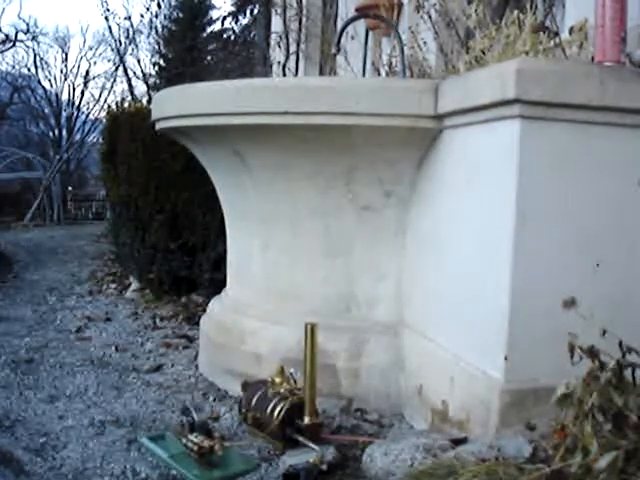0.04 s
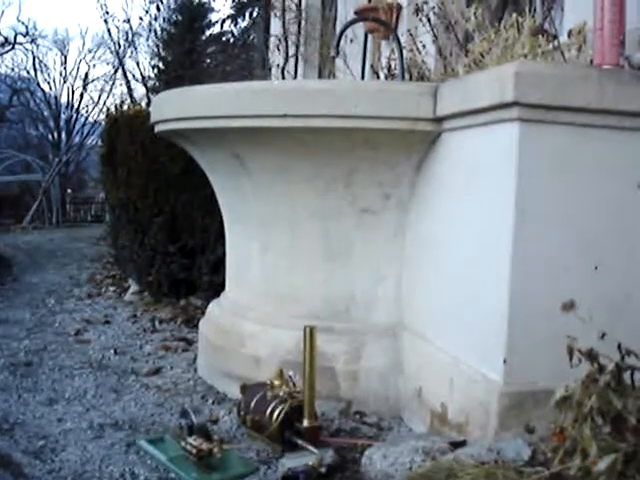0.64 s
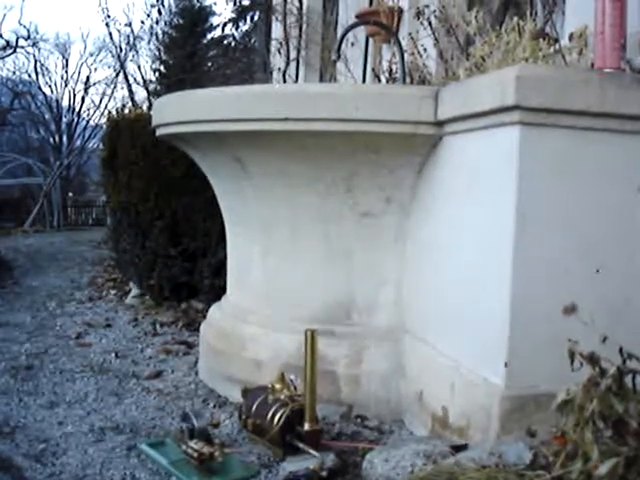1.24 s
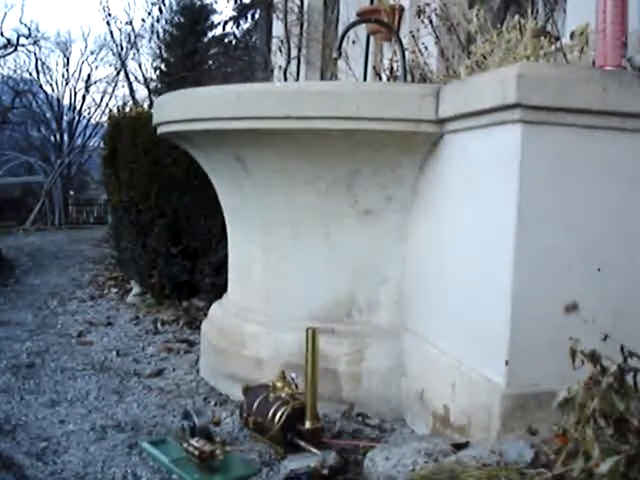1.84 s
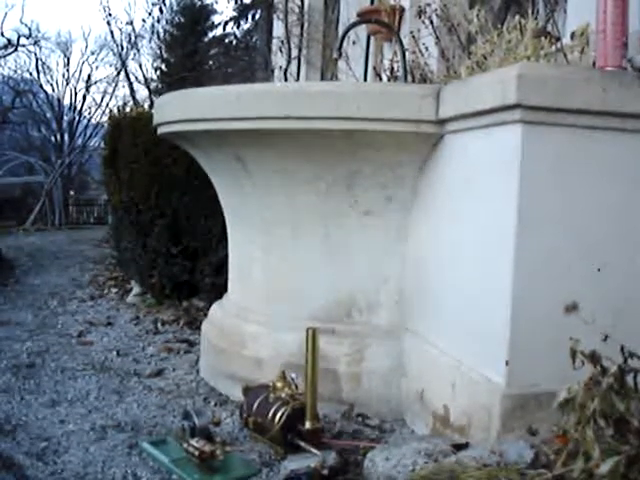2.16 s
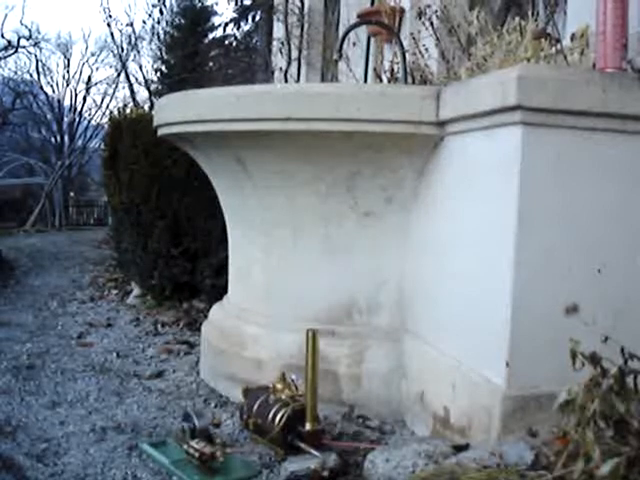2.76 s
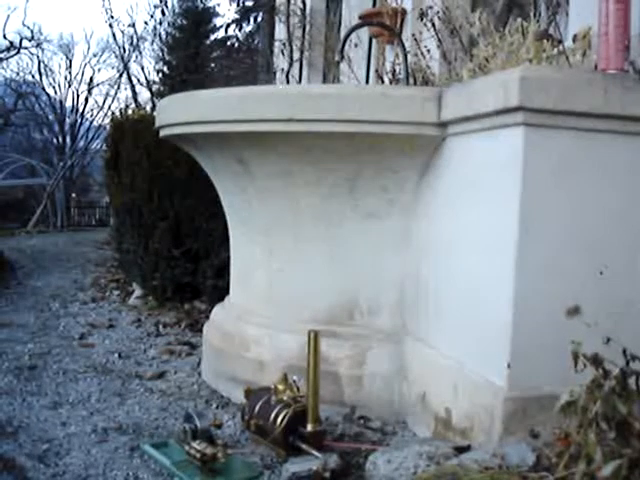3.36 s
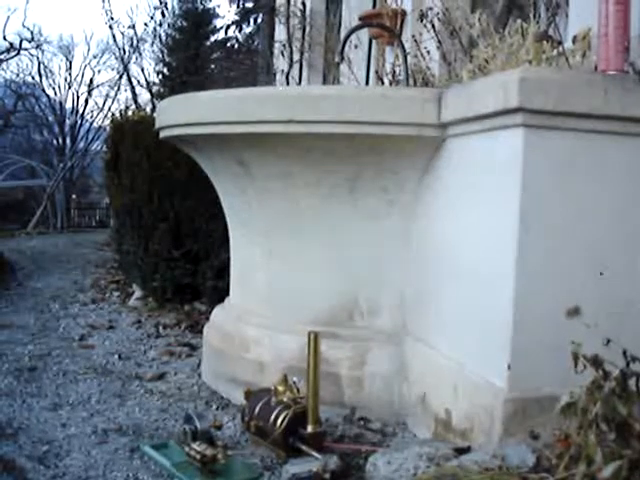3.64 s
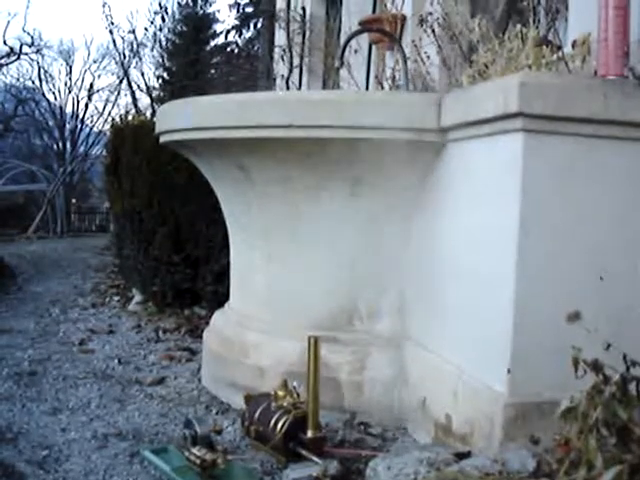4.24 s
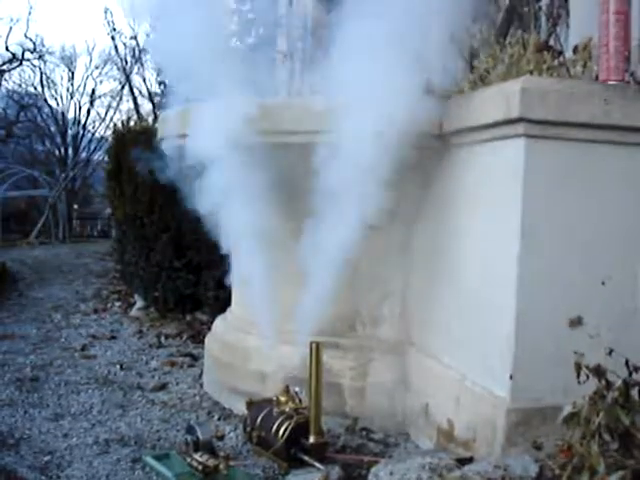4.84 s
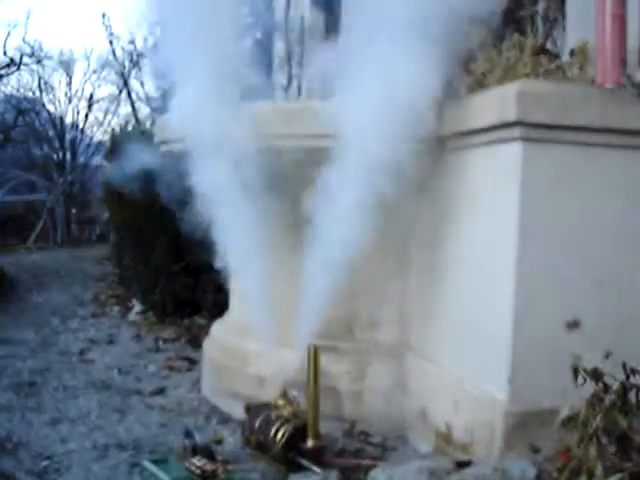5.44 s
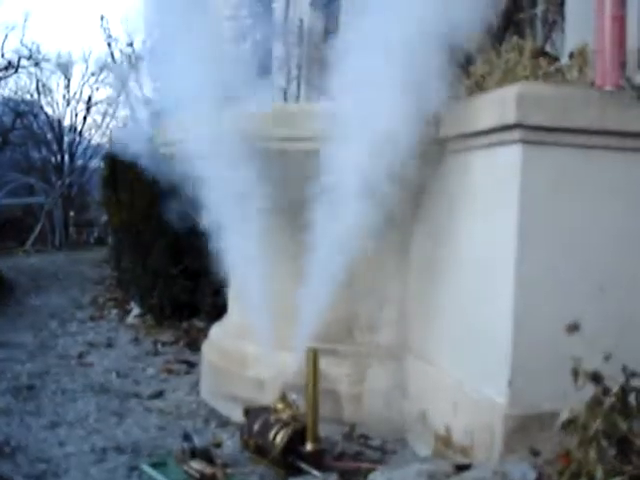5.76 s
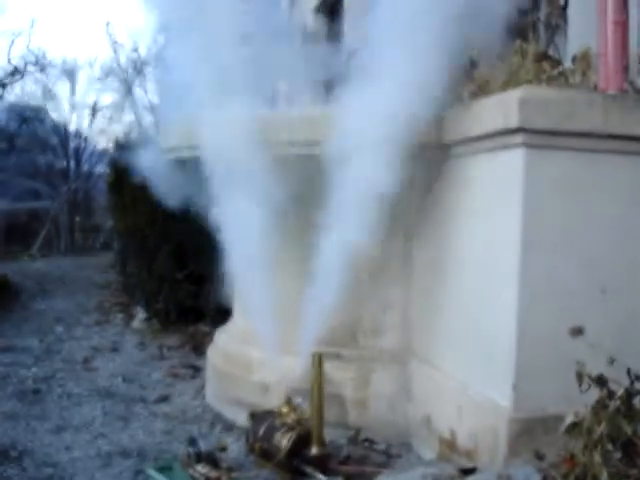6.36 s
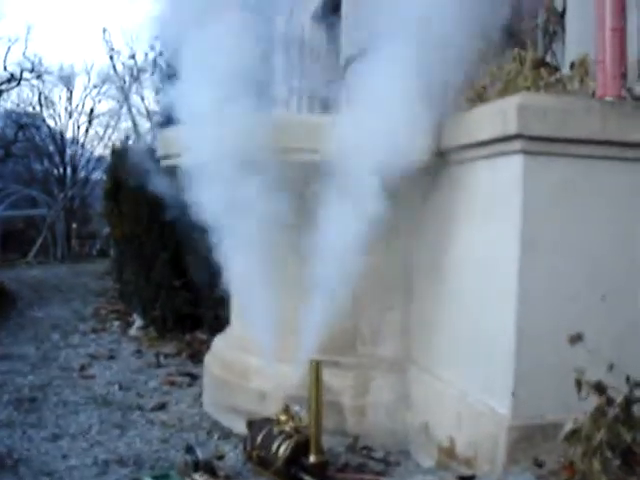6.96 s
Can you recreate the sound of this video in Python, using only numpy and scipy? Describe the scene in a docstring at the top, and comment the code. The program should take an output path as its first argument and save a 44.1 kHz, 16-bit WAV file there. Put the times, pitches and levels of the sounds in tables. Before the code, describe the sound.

Steady, hollow burner roar with a faint thin hiss, switching suddenly to the high, even hiss of jetting steam.

```python
"""Boiler blowing off steam

A small boiler roars outdoors against a stone wall, its flame ringing the flue, its safety valve simmering.
The valve pops open and steam jets out. The jet's shrill core, at the very top of the treble, slams the
limiter and is then filtered off: the roar sinks away and a bright hiss is left."""
import sys
import numpy as np
from scipy import signal
from scipy.fft import rfft, irfft, next_fast_len
from scipy.io import wavfile
from scipy.ndimage import uniform_filter1d

SR = 44100
rng = np.random.default_rng(int(sys.argv[2]) if len(sys.argv) > 2 else 0)


def pcm_store(signal):
    """Save signal as 16-bit PCM."""
    levels = np.round(np.clip(np.atleast_2d(signal), -1, 1) * 32767)
    wavfile.write(sys.argv[1], SR, levels.astype(np.int16).T)


N = 309141

# resonances of the fire tube and chimney: pitch_hz, half_width_hz, level_db
FLUE_MODES = [(147, 28.5, -14.5), (216, 3.5, -23), (340.3, 39.7, -3.5), (386, 38, -2.5), (489.6, 25, -7),
              (632, 15.8, -0.5), (697, 47, -6.2), (744, 62, -5.5), (873, 26, -11), (990, 21.5, -5),
              (1086, 101, -3), (1272, 47, -8.5), (1443, 44, -8.5), (1583, 79, -2.5), (1797, 50, -1.7),
              (1867, 56, -4), (2032, 67, -14.5)]
# resonances of the gas hissing through the burner: pitch_hz, half_width_hz, level_db
GAS_MODES = [(2710, 176, -8), (2957, 156, -7), (3050, 53, -3.5), (3235, 96, -0.8), (3584, 137, -5.5),
             (3790, 111, -12.5), (4223, 255, -8.5), (4801, 209, -20), (5220, 170, -12.5),
             (5860, 256, -11.5), (5980, 900, -18.5), (7250, 210, -16.5)]
# sputters of the flame: peak_s, half_width_s, rise_db
FLAME_SPUTTERS = [(.126, 0.011, 4), (1.993, 0.0062, 5), (2.119, .005, 5.5), (2.401, 0.0036, 5)]
# colour of the faint background rumble: frequency_hz, level_db
RUMBLE_COLOUR = [(10, 0.5), (30, 1), (50, -8), (100, -9), (300, -13.5), (3000, -31)]
# colour of the leak at the valve seat: frequency_hz, level_db
LEAK_COLOUR = [(2500, -22), (3700, 0.5), (4400, -4.5), (5300, -5.5), (6000, -7), (6700, -9), (7250, -3),
               (7600, -1), (8100, 1), (8500, 0.5), (8900, 0.5), (9350, -4.5), (10000, -10), (11500, -21.5)]
# moments when the flue sings out: start_s, end_s, pitch_hz, level_db
FLUE_NOTES = [(1.08, 1.24, 770, -30), (1.41, 1.56, 628, -27.5), (2.28, 2.71, 768, -28.5),
              (3.238, 4.1, 627, -30.5)]
# colour of the jet's shrill core: frequency_hz, level_db
CORE_COLOUR = [(10500, -56.5), (12000, -16), (16000, -11.5), (20000, -11)]
# colour of the plume's rush: frequency_hz, level_db
RUSH_COLOUR = [(150, -33), (600, -17), (2000, -11), (3000, -10.5), (3500, -3), (3800, -4.5), (4300, -3),
               (5000, 0.5), (5600, -0.5), (6100, -1), (6700, -6.5), (7100, -2), (8500, -14.5), (9900, -8.5)]
# colour of the sizzle at the valve lip: frequency_hz, level_db
SIZZLE_COLOUR = [(5500, -29.5), (6700, -18), (7400, -3), (8100, 2.5), (8500, 0.5), (8900, 0.5), (9300, 0),
                 (10000, -4.5), (11000, -12)]
# surges of the jet's core: peak_s, half_width_s, rise_db
CORE_SURGES = [(5.09, .07, 2), (5.3, .04, 2.8), (5.44, .04, 2.8), (6.49, .04, 1.5), (6.72, .04, 1.3),
               (6.9, 0.035, 1.5)]
# broad resonances of the valve outlet: pitch_hz, half_width_hz, level_db
OUTLET_MODES = [(4870, 720, 0), (6650, 750, -1.5), (9750, 380, -3.5)]

WALL_ECHO_S = 0.002358
SIMMER_DB, SIMMER_RISE_DB_PER_S = -32.5, 1.53  # the leak just before the pop, and its climb to there
CRACK_S, CRACK_RISE_S, CRACK_DB = 0.32, 0.35, 4.5  # the seat cracks open and the leak steps up
POP_S, POP_RISE_S = 4.3155, 0.012  # the valve lifts
CORE_DB, CORE_BUILD_DB, CORE_BUILD_S = 11.8, 2.2, 0.2  # full flow, how far below it starts, time constant
SAG_DB_PER_S = 1.0  # rush and sizzle fade as the boiler loses pressure
DROP_S, DROP_LENGTH_S, DROP_SIZZLE_DB, DROP_CORE_DB = 6.23, 0.11, -4.5, 0.6  # the jet's tone drops
OUTLET_DB, OUTLET_RISE_S = -11, 0.3  # the outlet's resonances swell in at the drop


def amp(db):
    """Decibels as a gain."""
    return 10 ** (np.asarray(db) / 20)


def unit_power(x):
    """The signal scaled to a power of one."""
    return x / np.sqrt(np.mean(x ** 2) + 1e-20)


def bins():
    """The frequency grid for shaping noise, in Hz."""
    return np.fft.rfftfreq(next_fast_len(N), 1 / SR)


def noise(gain):
    """Noise of unit power, shaped by a gain at each frequency."""
    size = next_fast_len(N)
    return unit_power(irfft(rfft(rng.standard_normal(size)) * gain, size)[:N])


def colour(points):
    """A gain curve drawn through a few points of a spectrum."""
    hz, db = np.transpose(points)
    return amp(np.interp(np.log(bins() + 1), np.log(hz), db))


def ringing(modes):
    """The gain curve of a set of resonances with steep skirts."""
    hz = bins()
    powers = (amp(db) ** 2 / (1 + ((hz - pitch) / width) ** 2) ** 2 for pitch, width, db in modes)
    return np.sqrt(sum(powers))


def flutter(depth_db, rate_hz):
    """Random swelling of a turbulent flow, from about once a second up to the rate."""
    hz = bins()
    return amp(depth_db * noise(hz / (hz + 1) / (1 + (hz / rate_hz) ** 2)))


def ramp(start_s, length_s):
    """Rises in a straight line from 0 to 1, then holds."""
    return np.clip((np.arange(N) / SR - start_s) / length_s, 0, 1)


def swells_db(rows):
    """A level curve of brief, bell-shaped swells."""
    t = np.arange(N) / SR
    return sum(db * np.exp(-((t - peak_s) / width_s) ** 2) for peak_s, width_s, db in rows)


def burner(roar_db, gas_db, low_cut_hz):
    """The turbulence of a steady flame rings the flue, over a smoother hiss of gas."""
    radiated = 1 / np.sqrt(1 + (low_cut_hz / (bins() + 1)) ** 4)  # a small chimney gives off no deep bass
    flame = amp(roar_db + swells_db(FLAME_SPUTTERS))
    flame *= flutter(depth_db=0.71, rate_hz=90) * flutter(depth_db=0.46, rate_hz=12)
    roar = flame * noise(ringing(FLUE_MODES) * radiated)
    gas = amp(gas_db) * noise(ringing(GAS_MODES)) * flutter(depth_db=0.5, rate_hz=30)
    return roar + gas


def wall_echo(x, share):
    """The wall just behind the valve adds one quick echo, which ripples the treble."""
    return unit_power(x + share * np.roll(x, round(WALL_ECHO_S * SR)))


def valve_simmer(split_hz):
    """A thin hiss from the seated valve grows with the pressure; its lows and highs flutter apart."""
    level_db = SIMMER_DB + SIMMER_RISE_DB_PER_S * (np.arange(N) / SR - POP_S)
    level_db -= CRACK_DB * (1 - ramp(CRACK_S, CRACK_RISE_S))
    leak = wall_echo(noise(colour(LEAK_COLOUR)), share=0.36)
    low = signal.sosfiltfilt(signal.butter(6, split_hz, fs=SR, output="sos"), leak)
    hiss = low * flutter(depth_db=1.3, rate_hz=30) + (leak - low) * flutter(depth_db=1.1, rate_hz=60)
    return amp(level_db) * hiss


def flue_note(start_s, end_s, pitch_hz, level_db, half_width_hz=17.4, fade_s=0.047):
    """One resonance of the flue swells, holds and settles again."""
    swell = ramp(start_s, fade_s) - ramp(end_s - fade_s, fade_s)
    return amp(level_db) * swell * noise(ringing([(pitch_hz, half_width_hz, 0)]))


def steam_jet(rush_db, sizzle_db):
    """Steam at full flow: the core builds and surges, rush and sizzle fade; later the tone drops."""
    open_s = np.maximum(np.arange(N) / SR - POP_S, 0)
    sag_db = SAG_DB_PER_S * open_s
    drop = ramp(DROP_S, DROP_LENGTH_S)
    core_db = CORE_DB - CORE_BUILD_DB * np.exp(-open_s / CORE_BUILD_S)
    core = noise(colour(CORE_COLOUR)) * amp(core_db + DROP_CORE_DB * drop + swells_db(CORE_SURGES))
    rush = wall_echo(noise(colour(RUSH_COLOUR)), share=0.061)
    rush *= flutter(depth_db=0.5, rate_hz=57) * amp(rush_db - sag_db)
    sizzle = wall_echo(noise(colour(SIZZLE_COLOUR)), share=0.29)
    sizzle *= flutter(depth_db=1.0, rate_hz=65) * amp(sizzle_db - sag_db + DROP_SIZZLE_DB * drop)
    outlet = noise(ringing(OUTLET_MODES)) * amp(OUTLET_DB) * ramp(DROP_S, OUTLET_RISE_S)
    return core + (rush + sizzle + outlet) * flutter(depth_db=0.64, rate_hz=39)


def limiter(x, limit_db, recovery_db_per_s):
    """Ducks the whole mix at once when its power passes the limit, and lets it back slowly."""
    power = uniform_filter1d((x ** 2).mean(0), size=300)
    power_db = 10 * np.log10(abs(power) + 1e-12)
    recovery_db = np.arange(N) / SR * recovery_db_per_s
    held_db = np.maximum.accumulate(power_db + recovery_db) - recovery_db
    over_db = np.maximum(held_db - limit_db, 0)
    return x / amp(uniform_filter1d(over_db, size=64))


def scene():
    """A bed of burner and outdoor rumble; the lifting valve crossfades the simmer into the jet."""
    fire = burner(roar_db=-19.6, gas_db=-31.0, low_cut_hz=80)
    fire += sum(flue_note(*note) for note in FLUE_NOTES)
    lift = ramp(POP_S, POP_RISE_S) ** 2
    steam = (1 - lift) * valve_simmer(split_hz=7000) + lift * steam_jet(rush_db=-6.4, sizzle_db=-4.8)
    air = amp(-63.5) * noise(colour(RUMBLE_COLOUR))
    return np.array([fire + steam + air] * 2)


def record(dry):
    """The limiter, a faint low noise floor, and a steep high cut that takes off the jet's core."""
    limited = limiter(dry, limit_db=-12, recovery_db_per_s=49)
    floor = amp(-67.5) * noise(colour(RUMBLE_COLOUR))
    high_cut = signal.firwin(701, cutoff=10080, window=("kaiser", 9), fs=SR)
    return signal.oaconvolve(limited + floor, high_cut[None], "same")


dry = scene()
out = record(dry)
pcm_store(out)
```